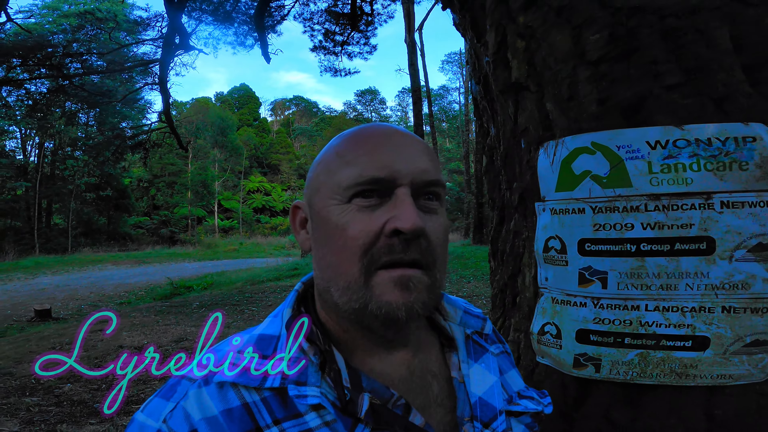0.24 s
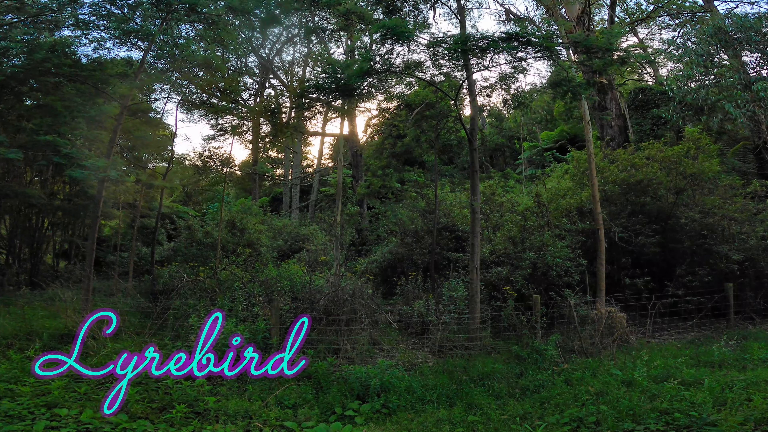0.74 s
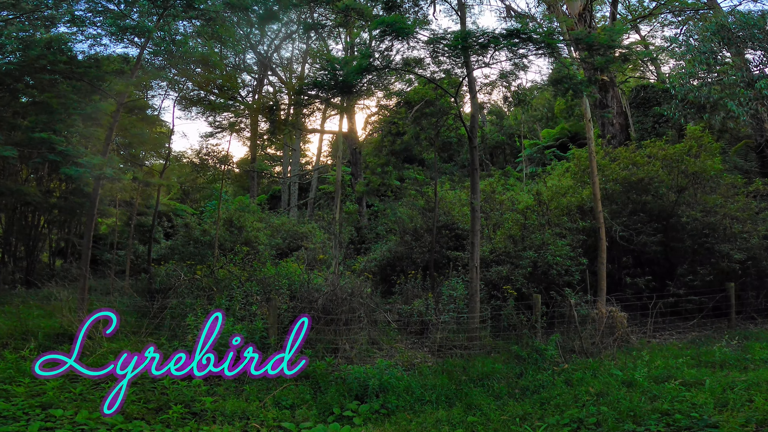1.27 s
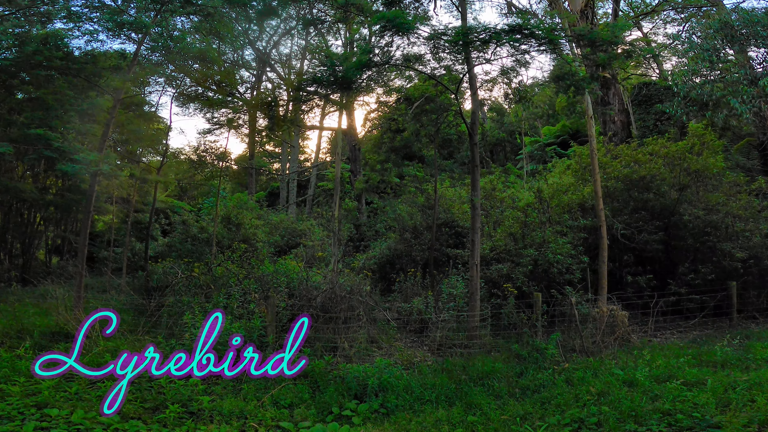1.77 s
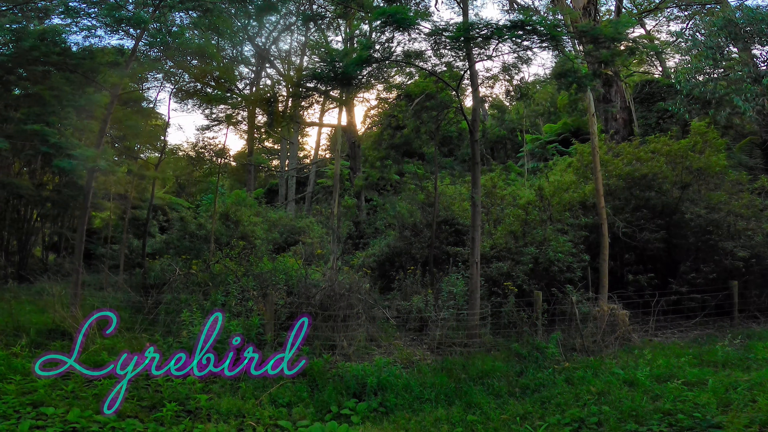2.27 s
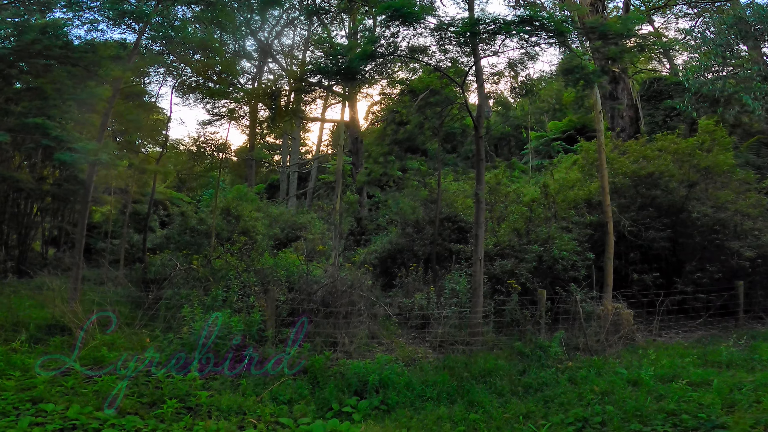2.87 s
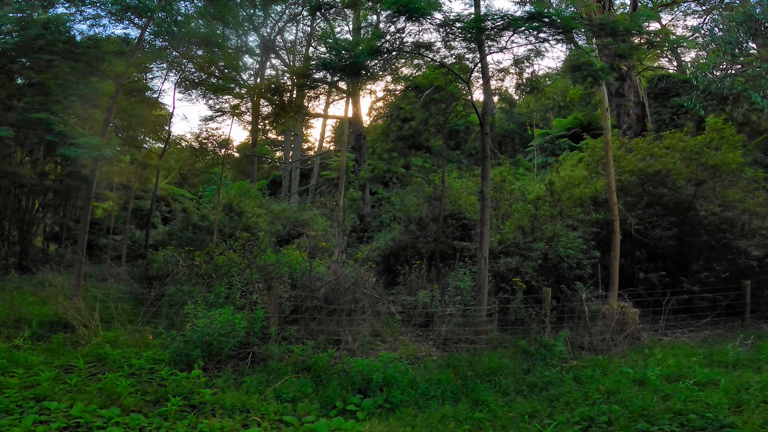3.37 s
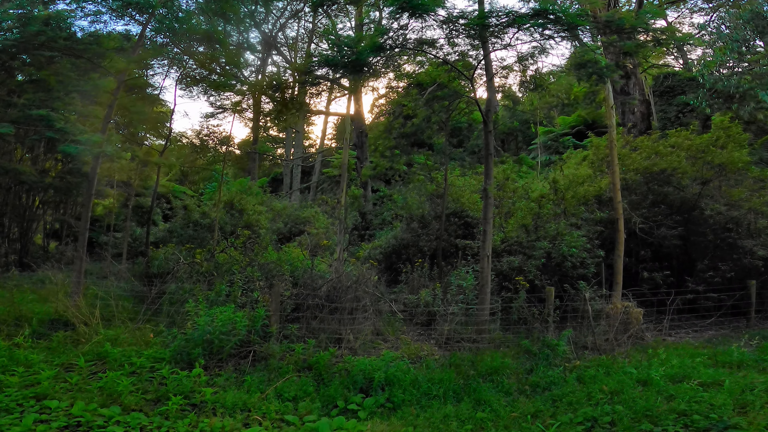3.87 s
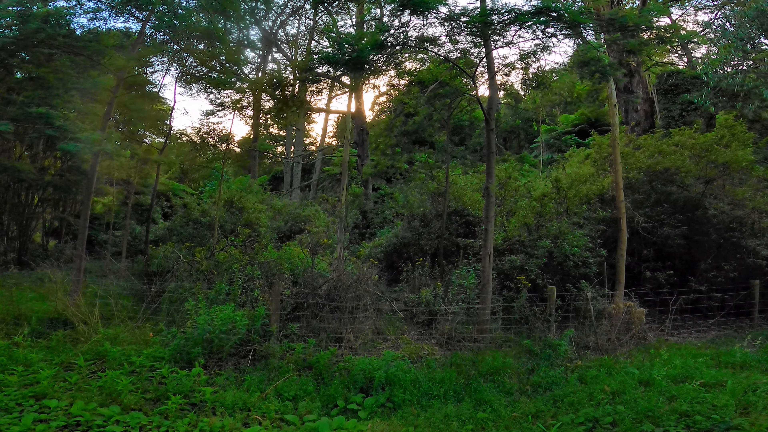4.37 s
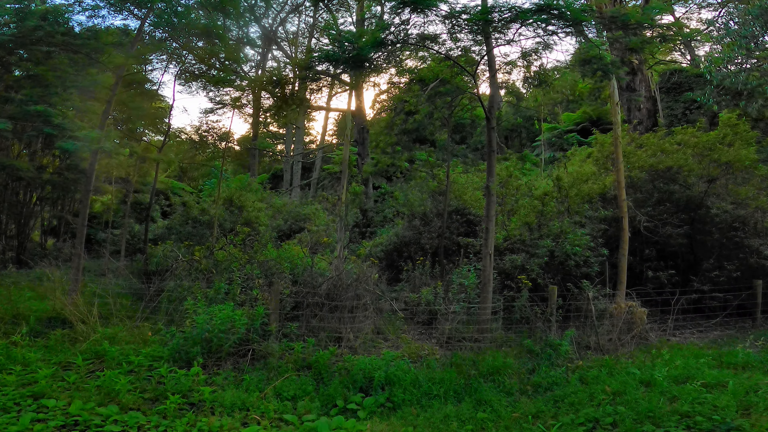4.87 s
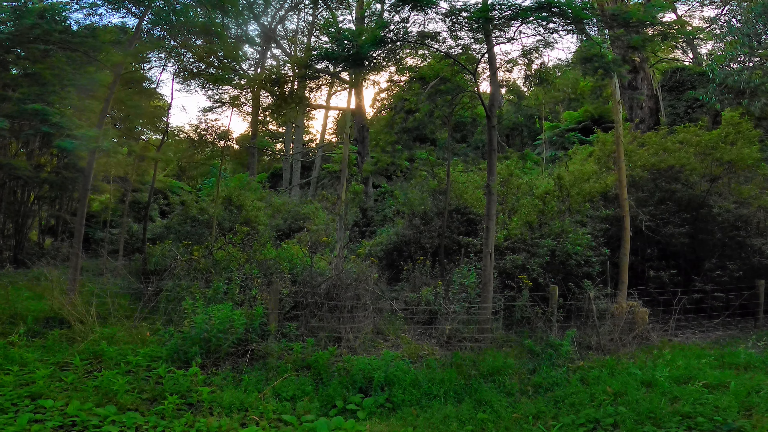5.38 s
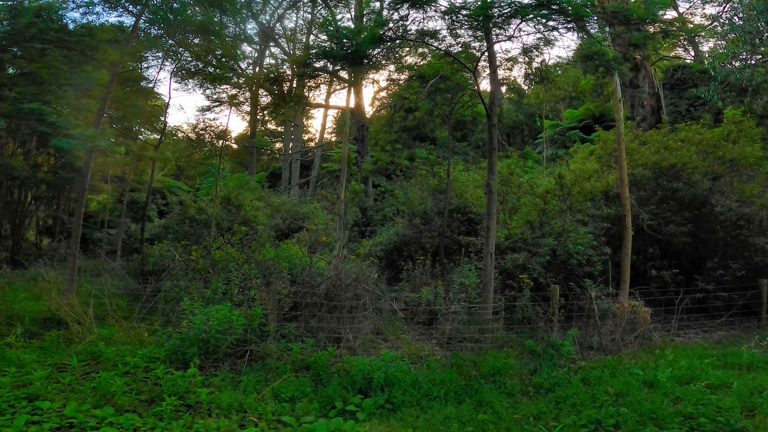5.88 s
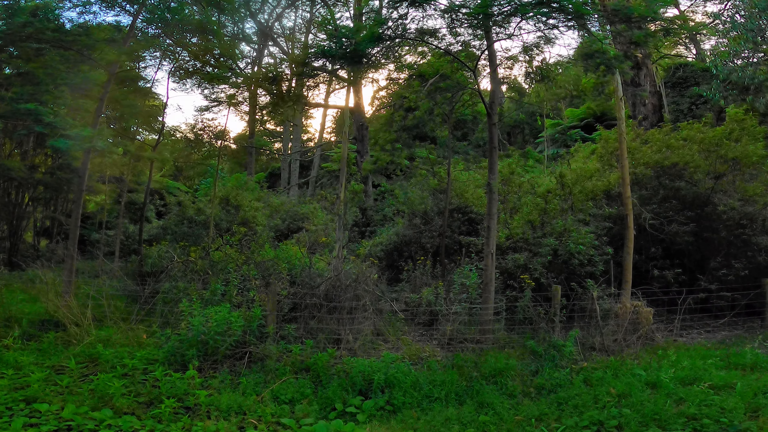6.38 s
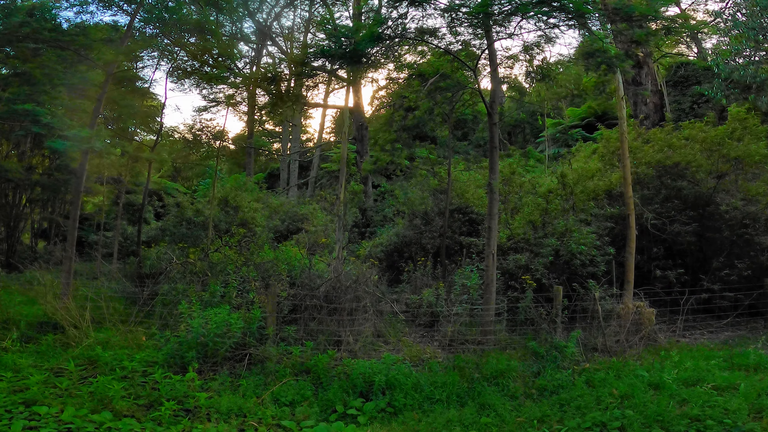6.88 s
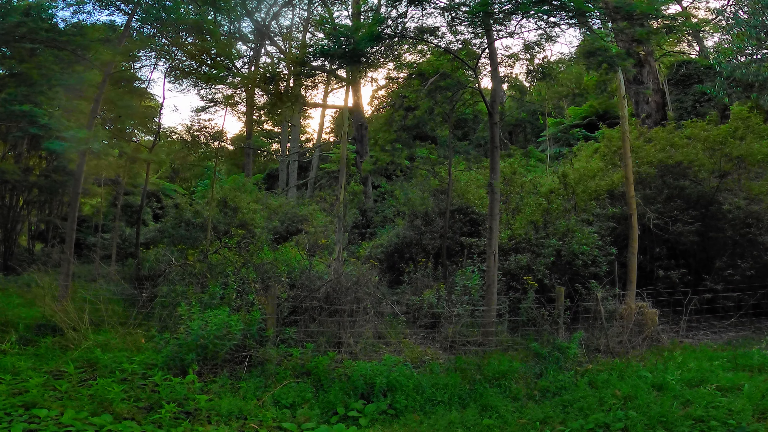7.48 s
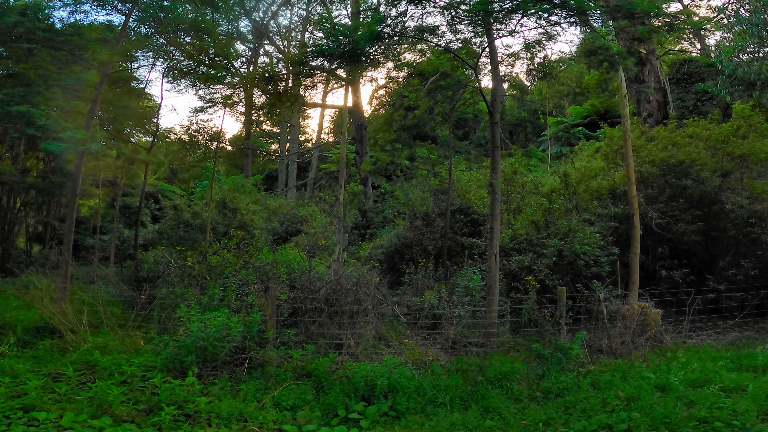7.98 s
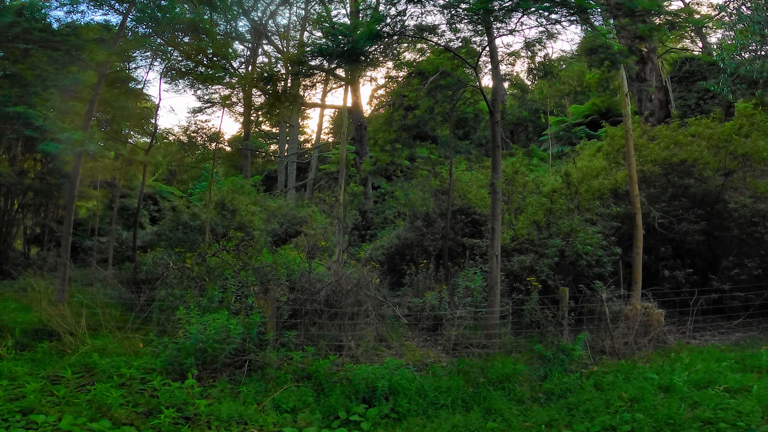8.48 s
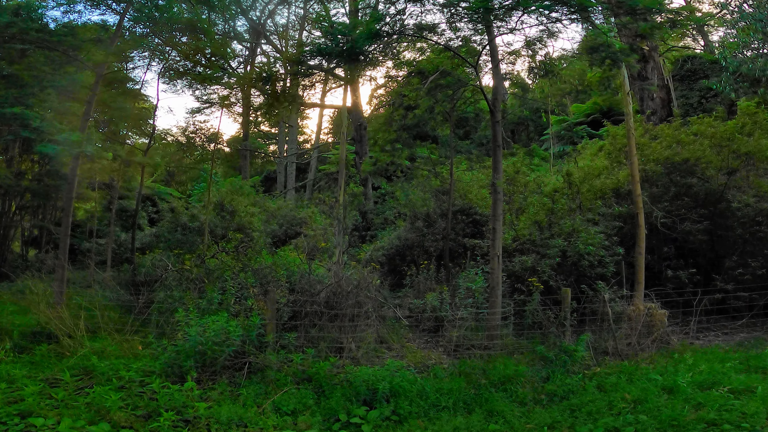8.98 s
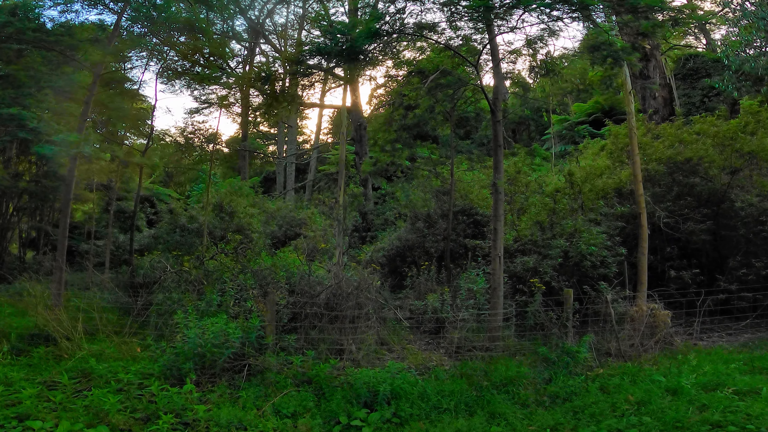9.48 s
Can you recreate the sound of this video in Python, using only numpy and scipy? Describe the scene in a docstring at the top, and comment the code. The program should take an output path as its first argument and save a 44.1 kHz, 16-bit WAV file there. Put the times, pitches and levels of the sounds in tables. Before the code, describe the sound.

A loud forest bird sings whip cracks, warbles, pure falling whistles and a run of quick low notes, echoing over leaf rustle and distant birds.

```python
"""A lyrebird sings from scrub at a forest edge: whip cracks, warbles, falling whistles and a run of quick low notes.
Each note is a gliding sine with throat-coloured overtones; rasps add hiss. Noise echoes scatter it into a long tail.
Small birds call farther off as swelling glides, over filtered-noise leaves, a low rumble and puffs of wind.
Just before the song the level drops away and returns higher. Source levels [dB] are before the mix gains."""
import sys
import numpy as np
from scipy import signal
from scipy.io import wavfile
from scipy.ndimage import uniform_filter1d, map_coordinates

SR = 44100
rng = np.random.default_rng(int(sys.argv[2]) if len(sys.argv) > 2 else 0)


def master(y):
    """Save y as 16-bit WAV."""
    cut = np.clip(np.atleast_2d(y).T, -1, 1)
    pcm = np.round(cut * 32767)  # scale
    wavfile.write(sys.argv[1], SR, pcm.astype(np.int16))


N = 429534
TIME = np.arange(N) / SR


def from_db(db):
    """Decibels to gain."""
    return 10 ** (np.asarray(db) / 20)


def rms_one(x):
    """Scale to unit rms."""
    return x / np.sqrt(np.mean(x ** 2) + 1e-20)


def in_time(rows, t):
    """Each column of a curve, read at the times t."""
    s, *columns = np.transpose(rows)
    return [np.interp(t, s, column) for column in columns]


def at_hz(points, hz):
    """A spectrum read on a log-frequency axis."""
    f, value = np.transpose(points)
    return np.interp(np.log(hz), np.log(f), value)


def drift(rate_per_s, t):
    """Smooth random curve: knots of spread 1, rate_per_s knots a second."""
    knots = rng.standard_normal(len(t) // 8 + 4)
    position = (t - t[0]) * min(rate_per_s, SR / 8)
    return map_coordinates(knots, [position], order=2, mode="mirror")


def span(start_s, end_s):
    """Sample numbers between two times."""
    return np.arange(max(int(start_s * SR), 0), min(int(end_s * SR), N))


def progress(t, begin_s, end_s):
    """0 before begin, rising evenly to 1 at end."""
    return np.clip((t - begin_s) / (end_s - begin_s), 0, 1)


# left-right likeness of diffuse sound: (frequency [Hz], likeness [0-1])
LIKENESS = [(30, .1), (100, 0.19), (200, 0.73), (1000, 0.55), (4000, 0.28), (12000, 0.12)]


def stereo_bands(size):
    """Narrow noise bands as (centre Hz, left and right), mixed from mid and side to a set likeness."""
    white = rng.standard_normal((2, 2, size))
    edges_hz = np.geomspace(22, 16000, 26)
    for k, (low, high) in enumerate(zip(edges_hz, edges_hz[1:])):
        band_pass = signal.butter(3, [low, high], "band", fs=SR, output="sos")
        mid, side = signal.sosfilt(band_pass, white[k % 2])
        hz = np.sqrt(low * high)
        alike = np.clip(at_hz(LIKENESS, hz), -1, 1)
        yield hz, np.sqrt(1 + alike) * mid + np.sqrt(1 - alike) * side * [[1], [-1]]


def coloured(bands, spectrum):
    """Noise bands weighted by a spectrum, within its range; rms 1."""
    lowest, highest = spectrum[0][0], spectrum[-1][0]
    return rms_one(sum(from_db(at_hz(spectrum, hz)) * band for hz, band in bands if lowest <= hz <= highest))


# far rumble, swelling and sinking: (time [s], level [dB])
RUMBLE = [(0, -74), (4.4, -84), (5.4, -73), (6.4, -72.5), (7.6, -76), (8.4, -80), (9.7, -82.5)]
# rumble spectrum: (frequency [Hz], density [dB per Hz])
RUMBLE_COLOUR = [(100, -26.5), (125, -10), (165, 5.5), (230, -2.5), (300, -5), (500, -13.5), (1000, -25)]


def far_rumble(bands):
    """Low noise, played backwards in time, under a slow level curve."""
    return from_db(in_time(RUMBLE, TIME)[0]) * coloured(bands, RUMBLE_COLOUR)[:, ::-1]


# wind puffs: (time [s], length [s], level [dB])
PUFFS = [(.1, .15, -73), (1.003, .05, -73), (2.625, 0.057, -71), (3.131, 0.05, -70), (4.57, 0.036, -71),
         (4.872, 0.043, -68), (5.596, 0.036, -61), (5.765, 0.026, -67), (6.124, 0.043, -62),
         (6.592, 0.037, -64.5), (7.226, 0.037, -65), (8.207, 0.03, -59.5), (9.607, 0.026, -63)]
# wind spectrum: (frequency [Hz], density [dB per Hz])
WIND_COLOUR = [(25, 6), (45, 3), (75, -6), (120, -25), (250, -37)]


def wind_puffs(bands):
    """Wind at the microphone: low noise with bell-shaped puffs over a faint floor, louder on the left."""
    gusts = from_db(-87) + sum(from_db(db) * np.exp(-((TIME - s) / length_s) ** 2) for s, length_s, db in PUFFS)
    return gusts * coloured(bands, WIND_COLOUR) * from_db([[1.5], [-4]])


# leaves and far air: (frequency [Hz], density [dB per Hz])
LEAVES = [(120, -20.5), (160, -12.5), (210, -7.5), (330, -7), (700, -7), (1050, 0.5), (2000, 6),
          (3100, -10.5), (4500, -9.5), (6400, -11), (8000, -17.5), (9800, -30), (11500, -50),
          (15000, -58.5)]
# louder rustle until the bottom of the fade: (frequency [Hz], density [dB per Hz])
RUSTLE = [(59, -44), (100, -17), (184, 0), (533, -8.5), (855, -5), (1320, 0.5), (4210, -13.5), (5550, -8.5),
          (6000, -9.5), (11000, -34), (14400, -63), (22000, -120)]
LEAVES_DB, RUSTLE_DB = -64, -52


def rustling_leaves(bands):
    """Steady shaped noise: the louder rustle, then leaves and far air."""
    rustle = from_db(RUSTLE_DB) * coloured(bands, RUSTLE)
    leaves = from_db(LEAVES_DB) * coloured(bands, LEAVES)
    return np.where(TIME < FADE[2][0], rustle, leaves)


def air():
    """Leaves, rumble and wind, coloured from the same noise bands."""
    bands = list(stereo_bands(N))
    return rustling_leaves(bands) + far_rumble(bands) + wind_puffs(bands)


# buzzy chips of small birds: (start [s], length [s], pitch [Hz], level [dB])
CHIPS = [(0.079, 0.049, 5980, -45), (0.113, 0.032, 5020, -45.5), (0.188, 0.033, 5280, -42),
         (0.246, .081, 2540, -44.5), (0.507, .07, 4850, -56), (5.445, .075, 6030, -57),
         (9.337, 0.04, 5790, -54), (9.417, 0.042, 5650, -52.5)]
CHIP_RISE, CHIP_BUZZ = 0.1085, .05   # shares of pitch
# clear pipes and thin glides of other birds: (start [s], length [s], start pitch [Hz], end pitch [Hz], level [dB])
PIPES = [(1.411, 0.11, 2080, 2060, -60), (2.66, .13, 5870, 6900, -66.5), (3.23, 0.13, 4600, 5900, -61),
         (4.77, 0.13, 2392, 2270, -52), (5.02, .14, 4670, 4960, -60), (5.123, .08, 4900, 5980, -63),
         (5.053, .14, 1350, 3010, -58), (6.0, 0.077, 2384, 2360, -58.5), (6.15, 0.091, 2170, 2137, -53),
         (8.149, 0.095, 5900, 6670, -67), (9.015, 0.084, 2786, 2743, -38), (9.14, 0.078, 2058, 2220, -37.5),
         (9.115, .033, 3910, 4910, -63), (9.217, 0.0267, 3830, 4980, -57.5)]
PIPE_WAVER = 0.0026   # share of pitch


def neighbours():
    """Sine glides that swell and die; fast random pitch drift makes chips buzz and pipes waver."""
    calls = [(start, length, hz, hz * (1 + CHIP_RISE), db, CHIP_BUZZ) for start, length, hz, db in CHIPS]
    calls += [(*row, PIPE_WAVER) for row in PIPES]
    out = np.zeros(N)
    for start, length, from_hz, to_hz, db, buzz in calls:
        at = span(start, start + length)
        along = np.linspace(0, 1, len(at))
        pitch_hz = (from_hz + (to_hz - from_hz) * along) * (1 + buzz * drift(600, at / SR))
        swell = np.sin(np.pi * along) ** 2
        out[at] += from_db(db) * np.sqrt(2) * swell * np.sin(2 * np.pi * np.cumsum(pitch_hz) / SR)
    return out


# scatter from leaves and twigs: (frequency [Hz], level [dB])
SCATTER = [(1000, -1.5), (2500, -2.5), (4000, 3.5), (10000, 7)]
# what far trunks send back best: (frequency [Hz], level [dB])
TAIL_COLOUR = [(850, -2), (1100, -1), (3100, 0), (3900, 4), (5200, 0), (7000, 2)]
# decay of the forest's tail by 60 dB: (frequency [Hz], t60 [s])
FOREST_T60 = [(500, 1.7), (1200, 1.09), (2200, 0.96), (4000, 0.96), (7000, 1.66), (12000, 0.96)]


def forest(x, scrub_db, tail_db, scrub_t60_s=0.21, first_echo_s=0.0057, build_s=0.029, lumpy_db=5):
    """Near scrub scatters a quick, lumpy burst; far trunks return a long tail, each band with its own decay."""
    t = np.arange(int(1.6 * SR)) / SR
    scrub, tail = 0, 0
    for hz, band in stereo_bands(len(t)):
        scrub = scrub + band * from_db(at_hz(SCATTER, hz))
        tail = tail + band * from_db(at_hz(TAIL_COLOUR, hz) - 60 * t / at_hz(FOREST_T60, hz))
    scrub = scrub * (t > first_echo_s) * from_db(lumpy_db * drift(1495, t) - 60 * t / scrub_t60_s)
    tail = tail * (1 - np.exp(-t / build_s))
    echoes = (from_db(scrub_db) * rms_one(scrub) + from_db(tail_db) * rms_one(tail)) / np.sqrt(len(t))
    return signal.fftconvolve(x[None], echoes, axes=1)[:, :N]


# ground echo cancelling direct sound: (frequency [Hz], width [Hz], share lost [0-1])
GROUND_DIPS = [(1328, 616, 0.85), (1663, 43, 0.84)]


def over_ground(x):
    """Direct sound, hollowed where the ground's echo arrives out of step."""
    for hz, width_hz, lost in GROUND_DIPS:
        peak = signal.lfilter(*signal.iirpeak(hz, hz / width_hz, fs=SR), x)
        x = x - np.clip(lost, 0, 1) * peak
    return x


# spells of rasp within notes: (start [s], end [s], phase jitter [rad], hiss level [dB])
RASPS = [(0.699, 0.726, .2, -44), (1.504, 1.54, .25, -48), (2.205, 2.28, 0.29, -33),
         (3.593, 3.64, 0.17, -46), (6.636, 6.684, .2, -55)]
# throat resonances that ring in the hiss: (frequency [Hz], width [Hz], level [dB])
RASP_RESONANCES = [(2870, 790, -1), (6300, 3000, -14)]


def rasp_hiss(t, phase):
    """Air escapes once in each cycle of a rasp and rings in the throat."""
    puffs = rng.standard_normal(len(t)) * (1 + np.sin(phase))
    hiss = 0
    for hz, width_hz, db in RASP_RESONANCES:
        b, a = signal.iirpeak(hz, hz / width_hz, fs=SR)
        ringing = signal.lfilter(b, a, signal.lfilter(b, a, puffs))
        hiss = hiss + from_db(db) * rms_one(ringing)
    flow = sum(from_db(db) * np.sin(np.pi * progress(t, begin, stop)) for begin, stop, _, db in RASPS)
    beak = signal.butter(3, 7500, fs=SR, output="sos")
    return signal.sosfilt(beak, hiss * flow)


# fast pitch warbles within notes: (first crest [s], end [s], rate [per s], depth [share of pitch])
WARBLES = [(1.167, 1.235, 58, 0.072), (2.032, 2.145, 36.5, 0.097), (2.879, 2.932, 74, 0.074),
           (3.064, 3.152, 82, 0.066), (3.556, 3.587, 92, 0.145)]
OVERTONE_SLOPE_DB = -4   # per overtone


def syrinx(note, throat, edge_s=.004, jitter=0.006, overtone_flutter_db=3.5, phase_noise=0.09):
    """One note: a gliding, nearly pure whistle with overtones coloured by the throat."""
    at = span(note[0][0] - edge_s, note[-1][0] + edge_s)
    t = at / SR
    pitch_hz, level_db, overtone_db = in_time(note, t)
    bend = jitter * drift(403, t)
    for crest, stop, per_s, depth in WARBLES:
        cycles = (t - crest) * per_s
        bend += depth * np.cos(2 * np.pi * cycles) * (cycles > -1 / 4) * (t < stop)
    phase = 2 * np.pi * np.cumsum(pitch_hz * (1 + bend)) / SR

    # in a rasp the membranes close at irregular moments, smearing overtones into noise
    rough = phase_noise + sum(depth * (t > begin) * (t < stop) for begin, stop, depth, _ in RASPS)
    closing = phase + uniform_filter1d(rough, size=256) * drift(1100, t)

    k = np.arange(2, 11)[:, None]   # harmonic numbers
    flutter_db = overtone_flutter_db * np.array([drift(119.5, t) for _ in k])
    weights = from_db(at_hz(throat, k * pitch_hz) + OVERTONE_SLOPE_DB * k) * (k * pitch_hz < SR / 2)
    weights = from_db(flutter_db - 5) * weights / np.sqrt(np.sum(weights ** 2, axis=0) + 1e-12)
    beak = signal.butter(3, [1300, 11500], "band", fs=SR, output="sos")
    overtones = signal.sosfilt(beak, np.sum(weights * np.sin(k * closing), axis=0))

    gate = np.sin(np.pi / 2 * np.clip(np.minimum(t - t[0], t[-1] - t) / edge_s, 0, 1)) ** 2
    voice = from_db(level_db) * np.sin(phase) + from_db(overtone_db) * overtones
    return at, np.sqrt(2) * gate * voice + rasp_hiss(t, phase)


# tone peaks first, then breaks into overtones: (share of length [0-1], tone [dB], overtones [dB])
CRACK_SHAPE = [(0, -22, -54), (.16, -5, -37), (.32, 0, -8), (.52, -9.5, 1), (.75, -17.5, -2.5),
               (1, -29.5, -19)]
CRACK_PLUNGE = 4.0   # time constants in one crack


def whip_crack(start, length, top_hz, bottom_hz, db, overtone_db):
    """The pitch plunges exponentially, fastest at first."""
    t = span(start, start + length) / SR
    along = progress(t, start, start + length)
    level, overtones = in_time(CRACK_SHAPE, along)
    pitch_hz = bottom_hz + (top_hz - bottom_hz) * np.exp(-CRACK_PLUNGE * along)
    return np.transpose([t, pitch_hz, db + level, overtone_db + overtones])


ONSET_DB, ATTACK_S = 14.5, 0.0066   # start below level; time constant
EASY_HZ, STRAIN_DB_PER_HZ = 2400, .032   # fundamental weakens above this pitch
HOOK_S = .022   # time constant of the pitch after the foot
BEAK_HZ, BEAK_WIDTH_HZ = 4050, 260   # overtones flare as the octave crosses this resonance
DROP_CURVE = 1.05   # 1 = even, more = level goes later
WAVER_DB, WAVER_PER_S = 1.3, 90


def falling_note(start, knee, foot, top_hz, knee_hz, foot_hz, bow, db, overtone_db, hook_s, hook_hz, swell_db,
                 drop_db, hook_db, brightest, overtone_swell_db, overtone_drop_db, beak_db):
    """Swells as the pitch sags to a knee, weakens as it drops to a foot, and ends on a hook up or down."""
    t = span(start, foot + hook_s) / SR
    sag, drop, hook = progress(t, start, knee), progress(t, knee, foot), progress(t, foot, foot + hook_s)
    pitch_hz = top_hz + (knee_hz - top_hz) * sag ** bow + (foot_hz - knee_hz) * drop
    pitch_hz = pitch_hz + hook_hz * (1 - np.exp(-hook * hook_s / HOOK_S))
    onset = ONSET_DB * np.exp(-(t - start) / ATTACK_S)
    strain = STRAIN_DB_PER_HZ * np.maximum(pitch_hz - EASY_HZ, 0)
    level = db - onset - strain - swell_db * (1 - sag) - drop_db * drop ** DROP_CURVE + hook_db * hook
    level = level + WAVER_DB * drift(WAVER_PER_S, t)
    flare = beak_db * np.exp(-((2 * pitch_hz - BEAK_HZ) / BEAK_WIDTH_HZ) ** 2)
    overtones = overtone_db - onset / 2 + flare
    overtones = overtones - overtone_swell_db * (sag - brightest) ** 2 - overtone_drop_db * (drop + hook)
    return np.transpose([t, pitch_hz, level, overtones])


# quick note's fall: (share of time [0-1], share of pitch drop [0-1], fundamental [dB], overtones [dB])
QUICK_FALL = [(0, 0.038, -16.5, -31.5), (.2, .21, 0.5, -26.5), (.55, .56, 1.5, -23), (.8, .85, -2.5, -22),
              (1, 0.94, -13.5, -23)]


def quick_note(start, end, top_hz, bottom_hz, db, upturn_db, upturn_s=.013, upturn=.1):
    """A short fall that hooks upward as it stops."""
    fall = [(start + (end - start) * when, top_hz + (bottom_hz - top_hz) * drop, db + level, db + over)
            for when, drop, level, over in QUICK_FALL]
    return fall + [(end + upturn_s, bottom_hz * (1 + upturn), db + upturn_db - 7.5, db + upturn_db - 27.0)]


# the run swells and eases: (time [s], effort [0-1])
RUN_EFFORT = [(4.82, 0), (5.05, 0.42), (5.7, 1), (6.1, .4), (6.42, 0.31)]
# each pair: without effort, added by full effort
RUN_DB, RUN_EFFORT_DB = -37.1, 3.4
RUN_BOTTOM_HZ, RUN_EFFORT_HZ = 830, 104.8
UPTURN_DB, UPTURN_EFFORT_DB = -19, 20


def run_note(start, length, top_hz):
    """With more effort a quick note is louder, stops higher and has a stronger hook."""
    effort, = in_time(RUN_EFFORT, start)
    return quick_note(start, start + length, top_hz, RUN_BOTTOM_HZ + RUN_EFFORT_HZ * effort,
                      RUN_DB + RUN_EFFORT_DB * effort, UPTURN_DB + UPTURN_EFFORT_DB * effort)


# notes sung once: (time [s], pitch [Hz], fundamental [dB], overtones [dB])
OPENING_RISE = [(.555, 840, -59, -74), (.575, 1051, -44, -62), (.6, 1323, -52, -58), (.625, 1645, -42, -55),
                (.678, 2254, -37.5, -65), (.69, 2400, -59, -70)]
NASAL_SLUR = [(1.125, 4090, -63, -87), (1.141, 2850, -43, -57.5), (1.158, 1745, -45, -45.5),
              (1.2, 1144, -48, -36), (1.22, 995, -39.5, -37), (1.255, 854, -46, -53)]
HIGH_ARCH = [(1.677, 2538, -41.5, -68), (1.695, 3190, -32, -59), (1.712, 4120, -38, -62),
             (1.729, 4306, -33, -52), (1.745, 4030, -37.5, -70), (1.76, 2647, -31.5, -50.5),
             (1.775, 2076, -33, -47), (1.81, 1797, -33, -58.5), (1.86, 1645, -44, -63)]
TRILL = [(2.02, 2402, -38.5, -70), (2.08, 2494, -26.5, -53), (2.14, 2273, -25.5, -50),
         (2.19, 1887, -29, -55), (2.212, 1880, -35, -49), (2.228, 1357, -50, -37),
         (2.268, 975, -45.5, -34.5), (2.276, 830, -60, -36)]
FLOURISH = [(3.553, 3620, -51, -79), (3.57, 3340, -33, -52), (3.59, 4346, -35.5, -54.5),
            (3.612, 2408, -22, -36.5), (3.635, 2021, -25, -41), (3.672, 2101, -32.5, -51.5),
            (3.686, 1033, -40, -44), (3.715, 1422, -31, -56), (3.745, 1470, -48, -55)]
SCOOPED_FALL = [(4.302, 2600, -50, -74), (4.312, 1967, -31, -53), (4.328, 1567, -30, -49),
                (4.345, 1490, -31.5, -60), (4.38, 1350, -32, -65), (4.4, 1000, -36, -57.5),
                (4.425, 920, -54.5, -69)]
LOW_ARCH = [(6.541, 1524, -46, -69), (6.578, 1300, -30.5, -65), (6.595, 1656, -33.5, -59),
            (6.61, 1912, -23, -57), (6.632, 1840, -21, -47), (6.655, 1572, -22.5, -46),
            (6.687, 1000, -34, -47.5), (6.702, 813, -47, -50)]
HELD_RISE = [(7.29, 891, -53.5, -65), (7.305, 1236, -48, -67), (7.32, 2030, -45.5, -69.5),
             (7.332, 2087, -30.5, -69), (7.355, 2220, -28.5, -64), (7.378, 2487, -26.5, -59.5),
             (7.405, 2494, -23, -62.5), (7.424, 2540, -38, -58)]
# whip cracks: (start [s], length [s], top [Hz], bottom [Hz], level [dB], overtones [dB])
CRACKS = [(0.703, .026, 5900, 680, -33, -35), (1.507, .031, 7600, 595, -27.5, -31)]
# harsh falls with an upward hook: (start [s], knee [s], foot [s], top [Hz], knee [Hz], foot [Hz],
# bow of the sag [1 straight, more = late], level [dB], overtones [dB], hook length [s], hook rise [Hz], swell [dB])
HARSH_NOTES = [(2.867, 2.946, 2.966, 2162, 1804, 930, .7, -28, -47, .08, 509, 13.5),
               (3.06, 3.165, 3.192, 2286, 1457, 880, .65, -25.8, -39, 0.027, 395, 1.4)]
# falling whistles: (start [s], knee [s], foot [s], top [Hz], knee [Hz], foot [Hz],
# bow of the sag [1 straight, more = late], level [dB], overtones [dB])
WHISTLES = [(4.095, 4.176, 4.222, 2960, 1898, 960, .75, -25.5, -52),
            (4.582, 4.652, 4.703, 2586, 1684, 977, 1.4, -27, -55),
            (6.873, 6.942, 6.983, 2616, 1830, 1000, .7, -22.5, -51),
            (7.562, 7.625, 7.66, 2516, 1793, 973, 1.38, -25.5, -55),
            (7.744, 7.79, 7.833, 2520, 1700, 1060, .9, -24, -53),
            (8.028, 8.108, 8.153, 2680, 1920, 1077, 1.1, -23.5, -55),
            (8.325, 8.41, 8.476, 2760, 2030, 1160, 1.15, -25, -60),
            (8.658, 8.748, 8.8, 2733, 1870, 1220, 1.25, -26.5, -61)]
# run of quick notes: (start [s], length of fall [s], top pitch [Hz])
RUN = [(4.82, 0.013, 1235), (4.921, .027, 1378), (5.024, 0.035, 1425), (5.134, 0.045, 1457),
       (5.253, 0.041, 1433), (5.356, .046, 1592), (5.483, .035, 1463), (5.592, 0.039, 1535),
       (5.705, .042, 1651), (5.821, 0.042, 1584), (5.936, .048, 1492), (6.054, .053, 1600),
       (6.177, 0.052, 1506), (6.293, 0.053, 1590), (6.413, 0.052, 1622)]
# throat and beak response, phrase by phrase: (frequency [Hz], gain [dB])
OPENING_THROAT = [(1500, 5), (2700, -0.5), (3600, -8), (5000, 1.5), (6500, -9.5), (10000, -14),
                  (11300, -31)]
HARSH_THROAT = [(1500, 7), (2800, 1.5), (4200, 3.5), (5500, 3), (6800, -7), (9800, -8.5), (11300, -24.5),
                (14500, -31.5)]
WHISTLE_THROAT = [(1800, 11.5), (2900, -2), (4000, 6), (4800, 0.5), (5600, -13.5), (6800, -2), (8200, 0),
                  (9900, 2), (11000, -11.5), (14500, -11.5)]
RUN_THROAT = [(2200, -1.5), (3300, -15.5), (4600, 12.5), (5500, 3.5), (6400, 9), (7800, -2), (9900, 7),
              (11000, -7)]
# starts of the harsh phrase and of the whistles: (time [s])
PHRASE_STARTS = [1.4, 4.0]


def lyrebird():
    """A nasal opening, harsh cracks and warbles, then pure whistles with the run among them."""
    song = [OPENING_RISE, NASAL_SLUR, HIGH_ARCH, TRILL, FLOURISH, SCOOPED_FALL, LOW_ARCH, HELD_RISE]
    song += [whip_crack(*row) for row in CRACKS]
    song += [falling_note(*row, drop_db=14, hook_db=3.5, brightest=0.61,
                          overtone_swell_db=42, overtone_drop_db=5.5, beak_db=-0.5) for row in HARSH_NOTES]
    song += [falling_note(*row, hook_s=.024, hook_hz=-110, swell_db=8, drop_db=14, hook_db=-11, brightest=0.99,
                          overtone_swell_db=27, overtone_drop_db=6, beak_db=8) for row in WHISTLES]
    throats = [OPENING_THROAT, HARSH_THROAT, WHISTLE_THROAT]
    notes = [(note, throats[np.searchsorted(PHRASE_STARTS, note[0][0])]) for note in song]
    notes += [(run_note(*row), RUN_THROAT) for row in RUN]
    out = np.zeros(N)
    for note, throat in notes:
        at, sound = syrinx(note, throat)
        out[at] += sound
    return out


LEFT_LAG_S = 1.6e-5


def scene():
    """The lyrebird stands a little to the right, so it reaches the left side later and softer."""
    song, others = lyrebird(), neighbours()
    near = over_ground(song)
    left = from_db(-6.5) * np.interp(TIME - LEFT_LAG_S, TIME, near)
    right = from_db(-3.5) * near
    direct = np.array([left, right])
    echoes = forest(song, scrub_db=-10.2, tail_db=-20.2) * from_db([[-.7], [.7]])
    far_birds = from_db(-7.5) * others + forest(others, scrub_db=-8.0, tail_db=-16.0)
    return direct + echoes + far_birds + air()


# overall level, holding its last value: (time [s], level [dB])
FADE = [(.34, 0.5), (.41, -25.5), (.44, -50), (.475, -12), (.55, 9)]
CUTOFF_HZ = 14600


def record(dry):
    """The level drops and returns once; a steep low-pass cuts the top."""
    faded = dry * from_db(in_time(FADE, TIME)[0])
    low_pass = signal.ellip(10, .1, 80, CUTOFF_HZ, fs=SR, output="sos")
    return signal.sosfilt(low_pass, faded)


dry = scene()
out = record(dry)
master(out)
```